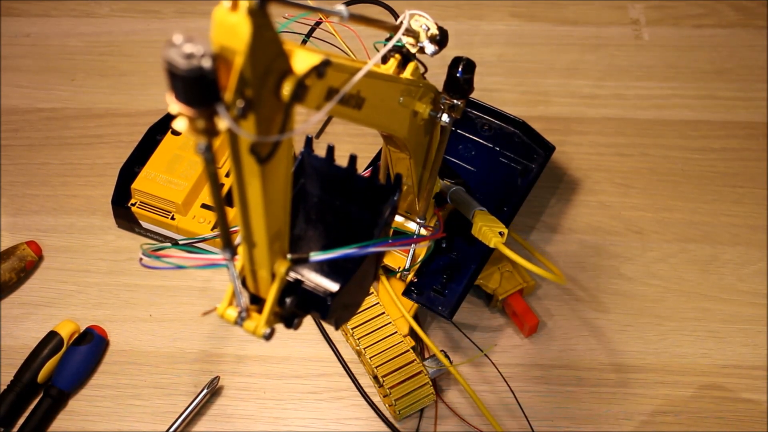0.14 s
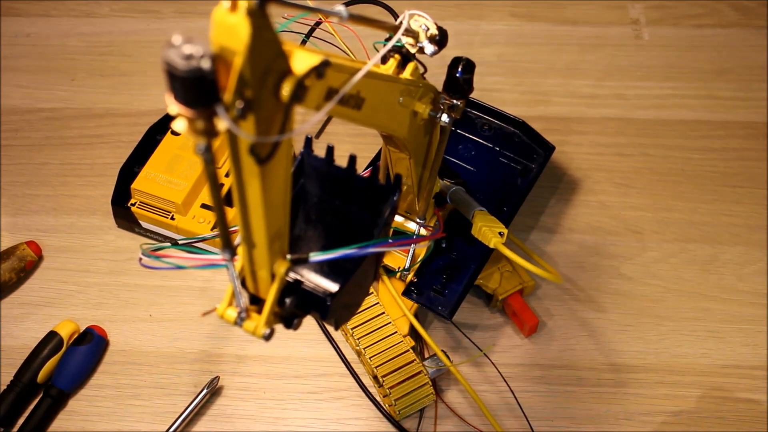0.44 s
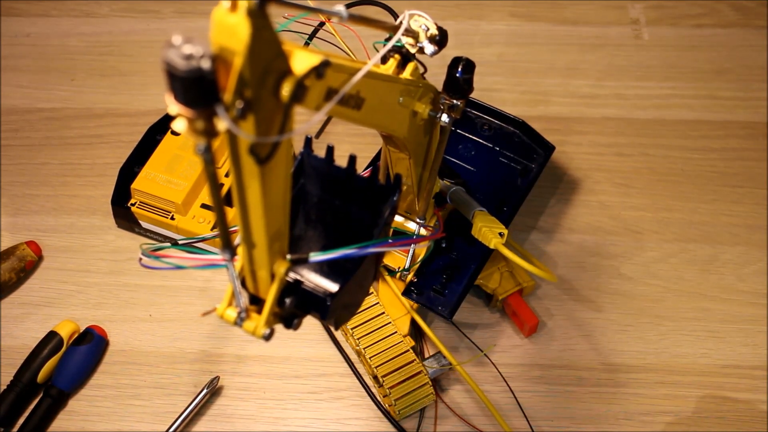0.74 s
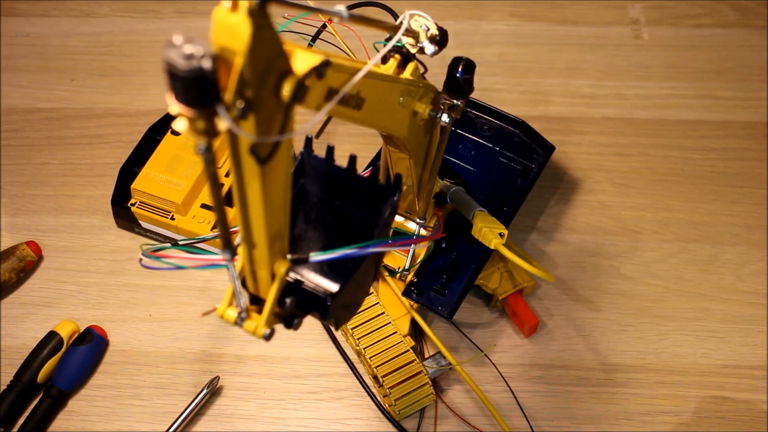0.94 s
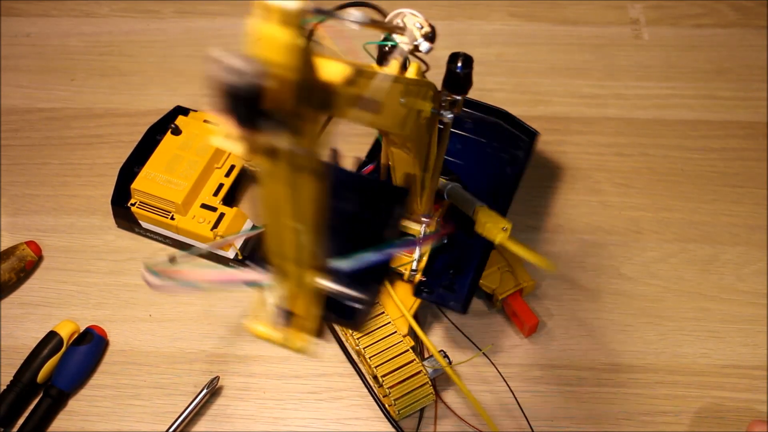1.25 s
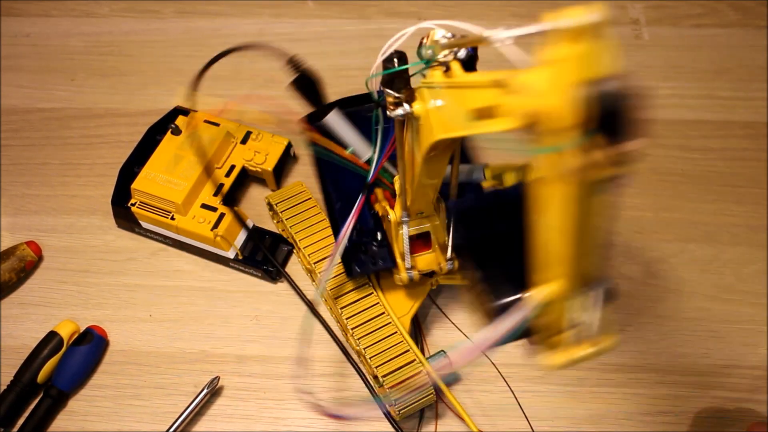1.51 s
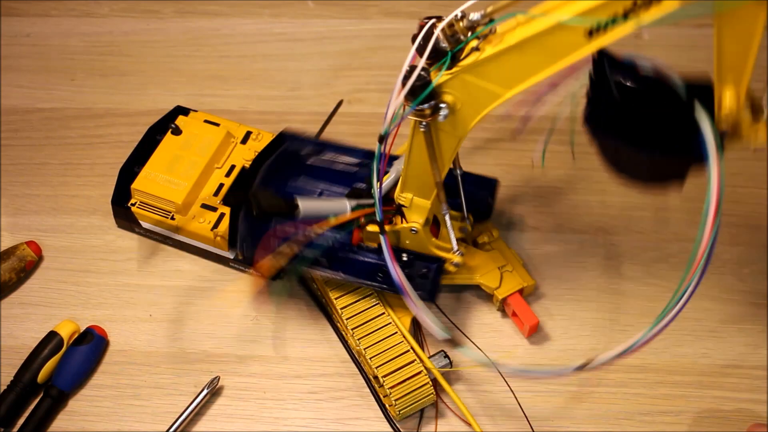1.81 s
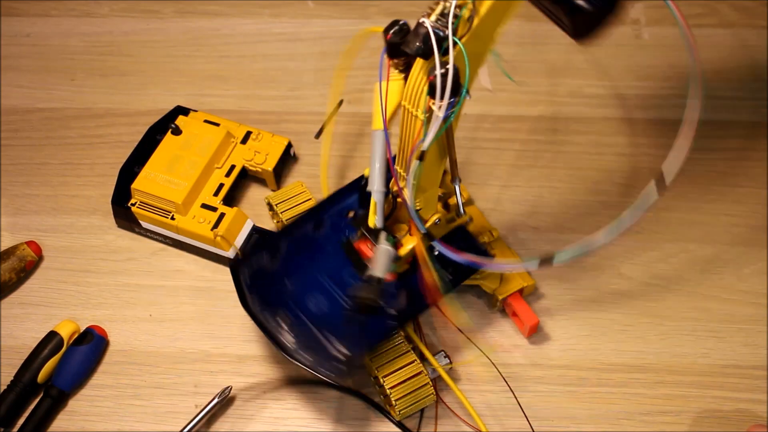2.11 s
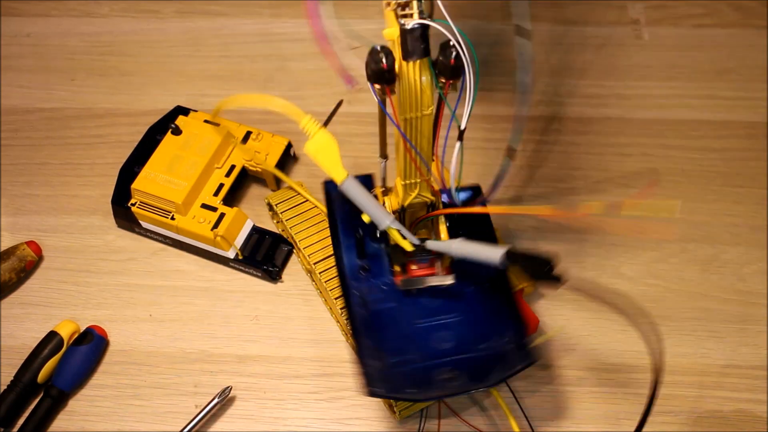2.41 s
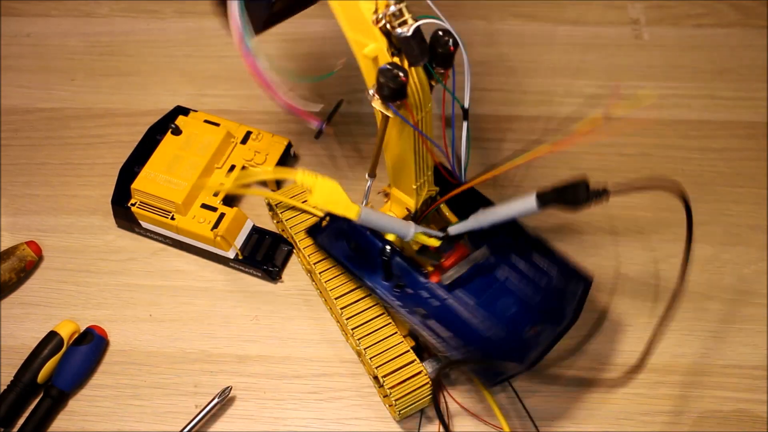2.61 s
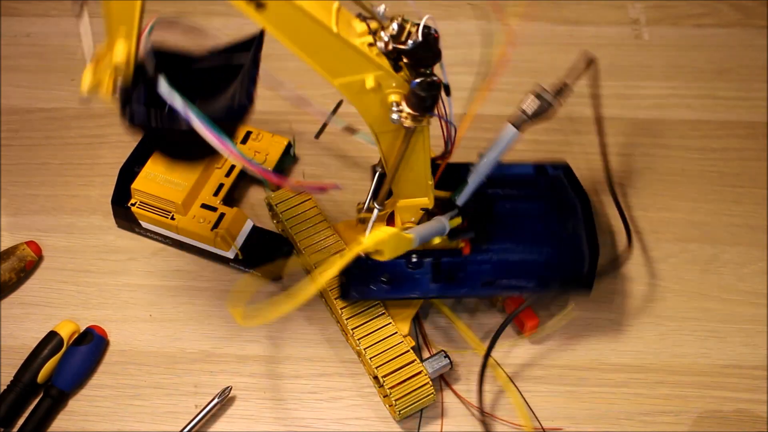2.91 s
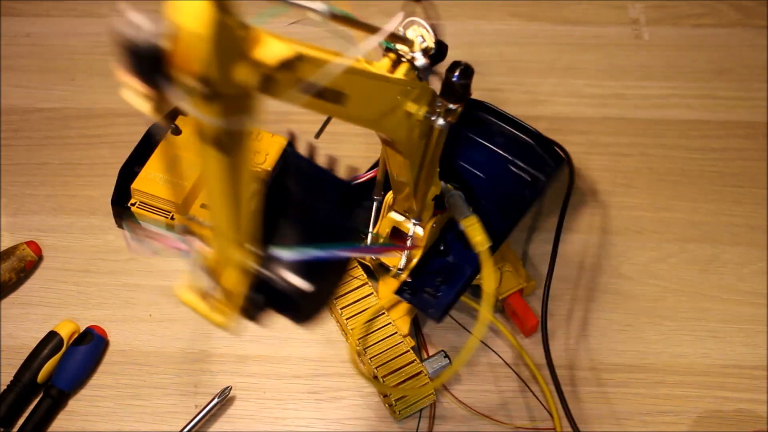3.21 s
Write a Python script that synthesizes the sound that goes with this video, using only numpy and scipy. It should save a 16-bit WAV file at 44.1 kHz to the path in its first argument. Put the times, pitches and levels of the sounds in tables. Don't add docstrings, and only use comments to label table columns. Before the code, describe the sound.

A small electric gear motor turns a model excavator on a wooden table, close-miked in a quiet, faintly hissing room. From 0.1 to 0.9 s, fingers click and knock a plastic controller, sharpest near 0.6. The motor twitches briefly at 1.1, rests, then whirs from 1.27 to about 3.3: bright, grainy gear buzz, shifting resonances, passing squeaky tones and irregular dull knocks, then stops quickly.

```python
import sys
import numpy as np
from scipy import signal
from scipy.fft import rfft, irfft, next_fast_len
from scipy.io import wavfile
from scipy.ndimage import uniform_filter1d, map_coordinates

SR = 44100
rng = np.random.default_rng(int(sys.argv[2]) if len(sys.argv) > 2 else 0)


def dump(signal):
    limited = np.clip(np.atleast_2d(signal).T, -1, 1)
    pcm = np.round(limited * 32767).astype(np.int16)
    wavfile.write(sys.argv[1], SR, pcm)


def volts_from_decibels(level):
    exponent = np.asarray(level, float) / 20
    return 10 ** exponent


N = 147735


def unit(x):
    return x / np.sqrt(np.mean(x ** 2) + 1e-20)


def along(points, hz):
    f, v = np.transpose(points)
    return np.interp(np.log(hz + 1), np.log(f + 1), v)


def wobble(rate):
    coarse = np.arange(0, N + 128, 128)
    knots = rng.standard_normal(200)
    return np.interp(np.arange(N), coarse, map_coordinates(knots, [coarse * min(rate, 50) / SR]))


def filtered(x, response):
    m = next_fast_len(N + SR // 2)
    return irfft(rfft(x, m) * response(np.fft.rfftfreq(m, 1 / SR)), m)[..., :N]


def resonance(f, hz, width_hz):
    wide = 1.5 * width_hz
    return f * wide / (hz * hz - f * f + 1j * f * wide)


def resonant(x, peaks):
    def bank(f):
        return sum((-1) ** k * volts_from_decibels(db) * 1j * f * width / (hz * hz - f * f + 1j * f * width)
                   for k, (hz, width, db) in enumerate(peaks))
    return filtered(x, bank)


# f/Hz, level/dB per Hz
AIR = [(40, 5.5), (160, -3.5), (450, -1), (1500, -4.5), (3000, -10), (10500, -19.5), (12500, -15.5),
       (15800, -16.5)]
# f/Hz, side over mid/dB
AIR_WIDE = [(300, 6.2), (3000, 2.6)]
AIR_DB = -60


def air():
    hiss = unit(filtered(rng.standard_normal((2, N)), lambda f: volts_from_decibels(along(AIR, f))))
    mid, other = volts_from_decibels(AIR_DB + 1.7 * wobble(8.56)) * hiss
    side = filtered(other, lambda f: volts_from_decibels(along(AIR_WIDE, f)))
    return mid + np.outer([1, -1], side)


# f/Hz, t60/s
ROOM = [(200, 0.26), (2000, 0.23), (10000, 0.22)]


def room(x):
    hz, t, z = signal.stft(rng.standard_normal((2, SR // 2)), SR, nperseg=256)
    fade = volts_from_decibels(-60 * t / along(ROOM, hz)[:, None])
    tail = signal.istft(z * fade, SR, nperseg=256)[1]
    late = np.pad(x, (300, 0))
    return signal.fftconvolve(late[None], tail / np.linalg.norm(tail[0]), axes=1)[:, :N]


# t/s,
# peak level/dB, centre f/Hz, breadth/octaves, ring time factor
CLICKS = [(0.088, -51, 563, 0.89, 0.26), (.169, -53, 450, 0.43, 0.39), (.195, -49, 2520, 1.2, 0.35),
          (.308, -67, 1400, .4, 0.68), (.3235, -27, 231, 1.24, 0.58), (.332, -31.5, 200, 0.8, 0.6),
          (.360, -31.5, 1840, 0.8, 1.1), (.367, -24, 1170, 1.24, 0.69), (0.398, -39, 1310, 0.57, 0.45),
          (.425, -48, 108, 0.44, 1.1), (.517, -37, 950, 1.1, 0.96), (.611, -21.5, 1950, 1.9, 0.9),
          (0.699, -39, 1610, 1.6, 1.5), (.712, -39, 1110, 0.57, 1.8), (0.775, -43.5, 2400, 0.16, 1.6),
          (.772, -46.5, 432, 1.2, 0.75), (0.867, -38.5, 730, 0.76, 1.3), (0.888, -49, 450, 1.1, 0.49),
          (1.117, -35.5, 1500, 1.8, 1.56), (1.155, -41.5, 446, 1.3, 1.7), (3.097, -29, 4430, 0.3, 1.3)]
# f/Hz, level/dB, t60/s
SHELL = [(96.4, -13, 0.24), (151, -2, 0.078), (423.6, -0.5, 0.14), (625, -14.5, 0.13), (1090, -5.5, 0.086),
         (1279, -3.5, 0.053), (2147, -1, 0.04), (2400, -2, 0.038), (2673, -6.5, 0.04), (3250, -8.5, 0.049),
         (4200, -5, 0.035), (4770, -7, 0.041), (8100, -6, 0.03)]
SHELL_TOP_HZ, CRACK_DB, CRACK_T60_S = 11400, 1, 0.048
RISE_S, SOFT_DB = 0.00052, -33.5


def controller():
    out, t = np.zeros(N + SR), np.arange(SR // 4) / SR
    f = np.fft.rfftfreq(len(t), 1 / SR) + 1
    for s, db, centre_hz, octaves, lasts in CLICKS:
        def near(hz):
            hump = np.exp(-.5 * (np.log2(hz / centre_hz) / octaves) ** 2)
            return hump / (1 + (hz / SHELL_TOP_HZ) ** 20) / (1 + (centre_hz / hz / 7) ** 4)

        ring = 0
        for hz, level, t60 in SHELL:
            fade = volts_from_decibels(level + rng.normal(0, 1) - 60 * t / (t60 * lasts))
            detuned_hz = hz * (1 + rng.normal(0, 0.011))
            ring = ring + near(hz) * fade * np.sin(2 * np.pi * detuned_hz * t)
        rough = 1 + 3 * uniform_filter1d(rng.standard_normal(len(t)), size=80)
        crack = unit(irfft(rfft(rng.standard_normal(len(t))) * near(f) / np.sqrt(f), len(t)))
        crack = crack * volts_from_decibels(CRACK_DB - 5 - 60 * t / (CRACK_T60_S * lasts))
        rise = 1 - np.exp(-t / (RISE_S * max(1, volts_from_decibels(SOFT_DB - db))))
        hit = rise * (ring * rough + crack)
        out[round(s * SR):][:len(t)] += volts_from_decibels(db) * hit / abs(hit).max()
    return out[:N]


# t/s, level/dB
LASH = [
    (1.103, -41),
    (1.118, -35),
    (.3605, -44),
    (.611, -39),
]
LASH_T60_S = .04


def lash():
    out, t = np.zeros(N), np.arange(SR // 10) / SR
    for s, db in LASH:
        out[round(s * SR):][:len(t)] += volts_from_decibels(db - 3 - 60 * t / LASH_T60_S) * rng.standard_normal(len(t))
    return filtered(out, lambda f: 1j * f / (2500 + 1j * f) * 18000 / (18000 + 1j * f))


# t/s, peak level/dB
KNOCKS = [(1.351, -48), (1.438, -49.5), (1.463, -45), (1.535, -40.5), (1.626, -48), (1.692, -53),
          (1.716, -49), (1.759, -48), (1.789, -56), (1.805, -48), (1.838, -47), (1.873, -47), (1.914, -44),
          (1.932, -38), (1.96, -34), (2.018, -38), (2.075, -39.5), (2.104, -35), (2.162, -50), (2.192, -40),
          (2.217, -44), (2.248, -52), (2.312, -45), (2.34, -42), (2.364, -48), (2.389, -40.5),
          (2.42, -36.5), (2.484, -40.5), (2.515, -43), (2.537, -52), (2.574, -39), (2.681, -40),
          (2.789, -47), (2.829, -47), (2.849, -45), (2.916, -50), (2.953, -39.5), (2.979, -48),
          (3.003, -42), (3.053, -53), (3.077, -54), (3.113, -47), (3.218, -50), (3.251, -48), (3.3, -47)]
# f/Hz, width/Hz, level/dB
HOUSING = [(937, 73, 9), (1055, 66, 9.5), (1165, 68, 7.5), (1477, 110, 4.5)]
KNOCK_S, KNOCK_DB = .0012, 4


def knocks():
    out, t = np.zeros(N + SR), np.arange(SR // 20) / SR
    body = resonant(np.eye(1, N)[0], HOUSING)[:len(t)]
    for s, db in KNOCKS:
        scrape = t * np.exp(-t / KNOCK_S) * rng.standard_normal(len(t))
        blow = 0.0043 * (t == 0)
        thump = signal.fftconvolve(scrape + blow, body)[:len(t)]
        out[round(s * SR):][:len(t)] += volts_from_decibels(db + KNOCK_DB) * thump / abs(thump).max()
    return out[:N]


SHAFT_HZ, TEETH_PER_S, TOOTH_SCATTER_DB, BEAT_DEPTH, HISS_DB = 65, 1800, 5.5, 0.12, -2


def teeth():
    turn = 2 * np.pi * np.cumsum(SHAFT_HZ * (1 + 0.06 * wobble(6))) / SR
    chance = rng.random((2, N))
    size, sign, hiss = rng.standard_normal((3, 2, N))
    strength = volts_from_decibels(TOOTH_SCATTER_DB * np.clip(size, -2, 2))
    hits = (chance < TEETH_PER_S / SR) * np.sign(sign) * strength
    beat = 1 + BEAT_DEPTH * (np.sin(4 * turn) + np.sin(turn / 2))
    return (unit(hits) + volts_from_decibels(HISS_DB) * hiss) * beat


# start t/s, length/s, f/Hz, width/Hz, level/dB
SPELLS = [(2.47, .64, 1460, 22, -13), (1.32, 0.038, 1490, 40, -15), (1.3, 0.12, 1490, 40, -17),
          (1.49, .12, 350, 35, -12), (1.94, .12, 350, 23, -9.5), (2.4, 0.086, 352, 17.6, -5.5),
          (1.27, .05, 429, 31, -11), (2.05, 0.04, 430, 31, -10), (2.6, 0.041, 425, 22, -10),
          (1.47, 0.13, 156, 21, -14), (1.4, .04, 144, 27, -11), (2.5, .06, 159, 15, -10.5),
          (1.9, 0.51, 3100, 150, -15), (2.54, .1, 2830, 83, -14), (2.84, .3, 3720, 40, -12.5),
          (3.09, .12, 2360, 36, -13), (2.2, .12, 3420, 70, -13), (1.45, .2, 3730, 200, -15),
          (1.83, 0.234, 8200, 400, -3), (2.1, 0.135, 8600, 400, -8), (2.92, .1, 8000, 400, -7.5),
          (2.4, 0.12, 8500, 450, -5), (1.65, 0.059, 11000, 250, -10.5), (1.92, .12, 9300, 190, -6.5),
          (2.8, .22, 9650, 110, -14), (1.75, .17, 14700, 600, -16), (1.98, .35, 14000, 700, -16),
          (1.9, .35, 10700, 330, -21)]
SPELL_EDGE_S = 0.022


def spells():
    t, m = np.arange(N) / SR, next_fast_len(N)
    f, force, out = np.fft.rfftfreq(m, 1 / SR), rfft(teeth(), m), 0
    for s, long_s, hz, width_hz, db in SPELLS:
        gate = np.clip(np.minimum(t - s, s + long_s - t) / SPELL_EDGE_S + .5, 0, 1)
        tone = irfft(force * resonance(f, hz, width_hz) ** 2, m)[:, :N]
        power = abs(uniform_filter1d(tone ** 2, size=SR // 25))
        tone = tone / (power + 1e-12) ** .3
        out = out + volts_from_decibels(db) * gate * tone / np.sqrt(np.sum(gate * tone ** 2) / np.sum(2 * gate))
    return out


# t/s, level/dB
DRIVE = [(1.085, -94), (1.101, -52), (1.119, -41), (1.164, -48), (1.2, -66.5), (1.252, -69), (1.271, -39.5),
         (1.3, -40), (1.49, -38), (1.82, -39), (1.96, -38.5), (2.3, -38.5), (2.77, -39.5), (3.18, -39),
         (3.309, -40.5), (3.35, -59)]
# f/Hz, level/dB per Hz
WASH = [(60, -19), (500, -9.5), (760, -18.5), (1150, -16.5), (1600, -9.5), (3500, -9.5), (6800, -11.5),
        (15800, -17.5)]
# f/Hz, width/Hz, level/dB, loudest at/turns, swing/dB
CAN = [(5580, 340, -17.5, 0.05, 2), (6350, 180, -25.5, 0.72, 0), (7950, 360, -10.5, 0.32, -0.5),
       (8180, 380, -14.5, 0.66, 0), (8560, 470, -5, 0.27, 0.5), (9150, 340, -8.5, 0.66, 0.5),
       (9610, 245, -13.5, 1, 2.5), (10550, 1000, -13, 0.34, 1), (12800, 620, -17, 0.31, 5),
       (15100, 420, -37, .1, 4)]
# f/Hz, width/Hz, level/dB, loudest at/turns, swing/dB
FRAME = [(1355.5, 23, -20.5, 0.2, 1), (1469, 52, -22, 0.22, 2), (1531, 52, -23.5, 0.1, 2),
         (1810, 81, -31, 0.69, 1), (2090, 110, -24.5, 0.32, 6), (2376, 163, -13.5, 0.53, 1.5),
         (2568, 100, -12.5, 0.33, 2.5), (2863, 290, -10.5, 0.28, 1.5), (3260, 120, -17.5, 0.46, 5),
         (3448, 93, -15, 0.29, 1.5), (3752, 85, -17.5, 0.87, 1.5), (4080, 310, -14, 0.052, 3.2)]
# f/Hz, width/Hz, level/dB, loudest at/turns, swing/dB
TABLE = [(64.5, 9.4, -17.5, 0.51, 1), (95.5, 10.5, -24, 0.24, 1), (122, 12.3, -19, 0.36, 1.5),
         (155.2, 19.6, -19, 0.42, 1), (188.6, 43, -24, 1, -5.5), (292, 37, -21.5, 0.26, 1),
         (349, 27, -17, 0.64, 0.5), (421.5, 34, -17, 0.27, 1), (497, 43, -27, .38, -3.5),
         (594, 54, -23.5, 0.62, 4.5)]
SLOW_DB = [-13, -1.5, 1]
RUN_S, SPIN_UP_S, TURN_START_S, TURN_S = 1.27, .13, 1.5, 1.95
WASH_DB, SLOW_HISS_DB, HISS_FROM_HZ, DRIFT_DB, FLUTTER_DB = -3, -7, 7000, .8, 2.2


def motor():
    s, drive_db = np.transpose(DRIVE)
    t, m = np.arange(N) / SR, next_fast_len(N)
    f = np.fft.rfftfreq(m, 1 / SR)
    slow = np.exp(-np.clip(t - RUN_S, 0, None) / SPIN_UP_S)
    wash = unit(filtered(teeth(), lambda f: volts_from_decibels(along(WASH, f))))
    high = filtered(wash, lambda f: 1 / (1 + (HISS_FROM_HZ / (f + 1)) ** 4))
    dulled = wash + (volts_from_decibels(SLOW_HISS_DB * slow) - 1) * high
    out = volts_from_decibels(WASH_DB + wobble(7.23)) * dulled + spells()
    for part, slow_db in zip([CAN, FRAME, TABLE], SLOW_DB):
        force = rfft(teeth(), m)
        for hz, width_hz, db, facing, swing_db in part:
            angle = 2 * np.pi * ((t - TURN_START_S) / TURN_S - facing)
            faces = np.cos(angle) + 0.33 * np.cos(2 * angle)
            unsteady_db = DRIFT_DB * wobble(4.074) + FLUTTER_DB * wobble(20)
            gain = volts_from_decibels(db + slow_db * slow + swing_db * faces + unsteady_db)
            out += gain * unit(irfft(force * resonance(f, hz, width_hz) ** 2, m)[:, :N])
    return out * volts_from_decibels(np.interp(t, s, drive_db, left=-120))


# f/Hz, side over mid/dB
WIDE = [(60, -14), (130, -15), (290, -17), (700, -10), (1410, -13.5), (3100, -12.5), (6400, -13.5),
        (12000, -5)]
# f/Hz, left over right/dB
LEAN = [(60, 5), (150, 4), (300, 1.7), (1000, -1.1), (3000, 0.1)]
# f/Hz, left ahead/radians
LEAD = [(60, -.3), (430, -.4), (1500, .15), (10600, -.3), (11100, -3.1), (15800, -3.3)]
ROOM_DB, FAR_DB, CLICK_SIDE_DB = -6, -10.5, -17.5


def scene():
    clicks, whirr = controller(), motor()
    near = clicks + knocks() + lash()
    echo = volts_from_decibels(ROOM_DB) * room(near) * volts_from_decibels([[0], [5]]) + volts_from_decibels(FAR_DB) * room(whirr[0])
    mid, other = whirr + near * [[1], [0]] + echo
    late_clicks = np.roll(clicks, shift=SR // 3000)
    side = filtered(other, lambda f: volts_from_decibels(along(WIDE, f))) + volts_from_decibels(CLICK_SIDE_DB) * late_clicks

    def ports(f):
        balance = volts_from_decibels(np.outer([.5, -.5], along(LEAN, f)))
        return balance * np.exp(np.outer([.5j, -.5j], along(LEAD, f)))
    return filtered(np.array([mid + side, mid - side]), ports) + air()


def band_limit(x):
    return signal.sosfilt(signal.butter(12, 15840, fs=SR, output="sos"), x)


LOW_HZ, TOP_HZ, GAP_HZ, GAP_WIDE_HZ = 50, 15830, 11200, 70


def record(dry):
    def response(f):
        bass_cut = (1j * f / (LOW_HZ + 1j * f)) ** 4 * 2 ** (LOW_HZ / (f + 9))
        gap = 1 - np.exp(-((f - GAP_HZ) / GAP_WIDE_HZ) ** 2)
        return (f < TOP_HZ) * bass_cut * gap
    finished = filtered(dry, response)
    return band_limit(finished)


dry = scene()
out = record(dry)
dump(out)
```